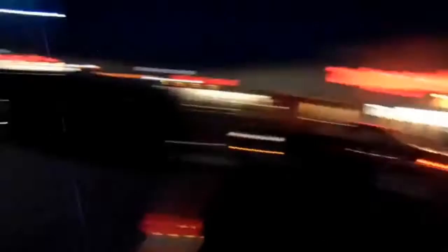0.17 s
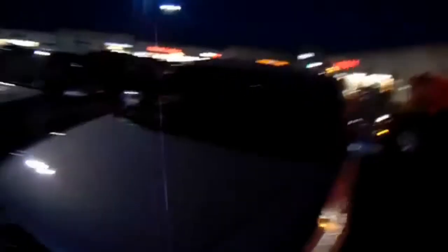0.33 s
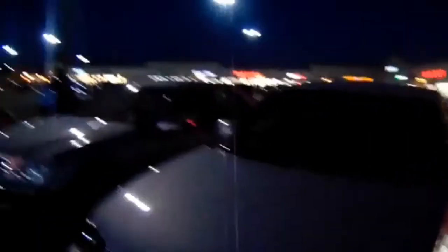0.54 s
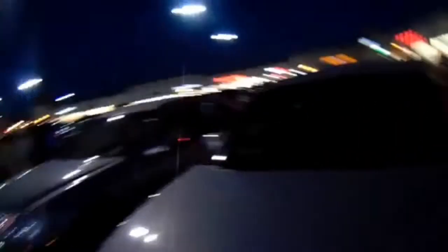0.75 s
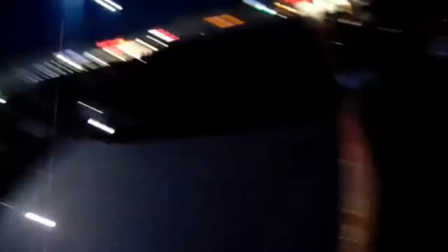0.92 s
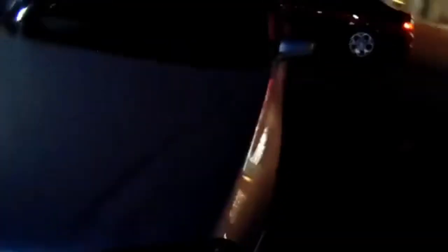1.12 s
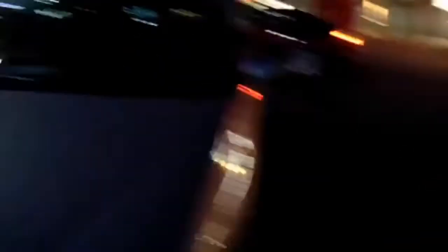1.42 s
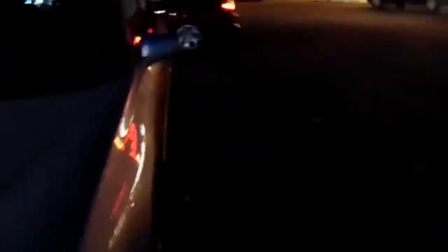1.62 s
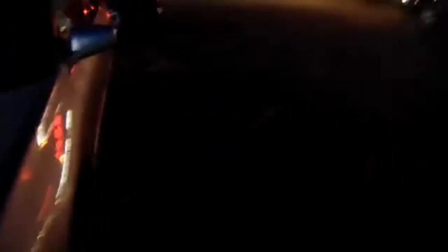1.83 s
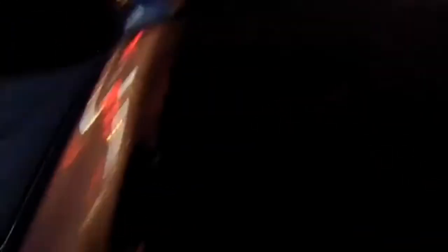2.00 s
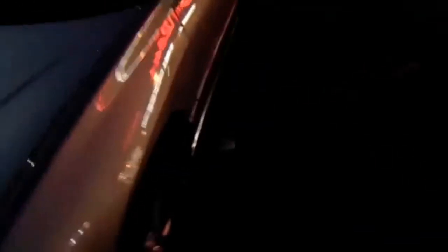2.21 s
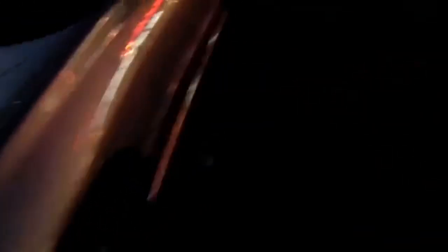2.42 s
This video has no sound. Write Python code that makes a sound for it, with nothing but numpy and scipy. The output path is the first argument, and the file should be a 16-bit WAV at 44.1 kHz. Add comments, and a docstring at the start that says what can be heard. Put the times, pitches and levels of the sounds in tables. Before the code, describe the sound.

One loud, boomy car door slam outdoors, then engine hum and airy rush swelling back

```python
"""A car park at night: a car door is slammed close to the microphone, beside an idling engine.
Contacts crash as decaying noise bands, panel and cabin ring as modes, and the microphone overloads.
Its gain control ducks, then lets hum (summed engine orders) and fan and traffic (noise bands) swell back.
A small tick falls in the slam's tail; later come a dull bump (noise and modes), a hard click (modes)
and a run of small scratchy ticks (noise)."""
import sys
import numpy as np
from scipy import signal
from scipy.io import wavfile
from scipy.ndimage import uniform_filter1d

SR = 44100
rng = np.random.default_rng(int(sys.argv[2]) if len(sys.argv) > 2 else 0)


def unload_audio(sound):
    """Save the sound as a 16-bit wav file, at the path given as the first command line argument."""
    columns = np.transpose(np.atleast_2d(sound))
    # keep every value between -1 and 1, then stretch to whole-number steps
    steps = np.round(np.clip(columns, -1, 1) * 32767)
    wavfile.write(sys.argv[1], SR, steps.astype(np.int16))


N = 112454
TIME = np.arange(N) / SR  # seconds
BAND_EDGES_HZ = 20 * 2 ** np.arange(0, 9.9, 1 / 3)  # third octaves
BAND_CENTRES_HZ = np.sqrt(BAND_EDGES_HZ[1:] * BAND_EDGES_HZ[:-1])

# idle rate of the engine: start_s, rate_hz
IDLE_RATE = [(0, 35.86), (0.7, 36.1), (1.25, 36.25), (1.9, 36.17), (2.55, 36)]
# engine orders: multiple of the idle rate, level_db
LOW_ORDERS = [(4, 1.5), (5, -1.5)]
UPPER_ORDERS = [(6, -1.5), (8, -4.5), (9, -1), (10, 0), (11, -22.5), (12, -3), (13, -15.5), (14, -8.5),
                (15, -16.5), (19, -11), (20, -21), (21, -22), (22, -18), (23, -15), (24, -10.5)]
# engine as heard while the microphone moves round the car:
# start_s, second_order_db, third_order_db, low_orders_db, upper_orders_db
HUM_LEVEL = [(0, -53, -40, -47.5, -49.5), (0.2, -35, -46, -42, -54), (0.5, -32, -22.5, -28.5, -40),
             (0.9, -27, -30, -30, -40.5), (1.25, -31.5, -27.5, -31.5, -38.5), (1.6, -38, -49, -33.5, -40.5),
             (1.9, -37.5, -32.5, -35, -39), (2.1, -36.5, -38.5, -35, -32), (2.27, -41, -28.5, -36, -39),
             (2.42, -32.5, -27, -33.5, -35.5), (2.55, -39, -30, -34, -38)]
FIRING_BLUR_TURNS = 0.17  # random phase spread between orders
WHIRR_BAND_HZ, WHIRR_DB = (1400, 1750), -15  # level relative to the second order

# colour of fan and traffic noise: pitch_hz, density_db (per Hz, relative)
AIR_COLOUR = [(25, 1), (70, 3), (150, -1.5), (240, -7), (350, -4), (600, -12.5), (850, -9), (1330, -15.5),
              (1600, -17), (2600, -23), (3500, -27), (5000, -31.5), (8000, -36), (14000, -39.5)]
# its level: start_s, bass_db, low_middle_db, middle_db, treble_db
AIR_LEVEL = [(0, -33.5, -34.5, -33.5, -30.5), (0.22, -36.5, -32.5, -35.5, -31.5),
             (0.5, -22, -26.5, -28.5, -29), (0.85, -21.5, -28.5, -31, -27), (1.2, -28.5, -29.5, -27, -28),
             (1.7, -31, -30.5, -30, -31), (2.0, -34.5, -31, -29, -29), (2.3, -38, -27.5, -28.5, -28.5),
             (2.55, -40, -30.5, -27.5, -28.5)]
# centres of those four zones: pitch_hz
AIR_ZONES_HZ = (70, 240, 900, 7000)

# door contacts (seal, latch, frame, rattles): start_s, level_db, brightness_db_per_octave
SLAM_CONTACTS = [(0.236, -21.5, -5), (0.2478, -1, 0.36), (0.2535, -13.5, 4), (0.260, 2, -0.66),
                 (0.277, 0, 0), (0.2855, 0, -5), (0.2912, 0, -1), (0.3005, -2, -4.5), (0.311, -12, -8),
                 (0.334, -10, -1)]
# crash of each contact: pitch_hz, density_db (per Hz, relative)
CRASH_COLOUR = [(40, -2.5), (190, 0), (450, -0.5), (950, -7.5), (1700, -16), (3100, -14), (6000, -25.5),
                (8500, -33.5), (14000, -36)]
# its decay: pitch_hz, t60_s
CRASH_DECAY = [(60, 0.41), (300, 0.14), (1000, 0.19), (3000, 0.11), (12000, 0.14)]
# blows that ring the panel: start_s, level_db
PANEL_BLOWS = [(0.2535, 6.5), (0.2855, -5.5)]
# modes of door panel and glass: pitch_hz, level_db, t60_s
PANEL_MODES = [(107.4, -22, .45), (152.6, -31, .18), (191.8, -8, .2), (241.6, -13.5, 0.14),
               (351, -17.5, 0.14), (404, -18, .17), (440, -23.5, .16), (551, -18.5, .16),
               (633.2, -14, 0.13), (728, -16, .14), (798, -16.5, .14), (967, -12, 0.18), (1039, -19, 0.11),
               (1172, -7.5, 0.053), (2740, -22, .1)]
# air trapped in the cabin as the door seats: start_s, level_db
SEATING = [(0.2665, -3)]
# modes of the cabin: pitch_hz, level_db, t60_s
CABIN_MODES = [(61, 10, 0.24), (46.15, -5, 0.85), (29, -7, 0.17)]
# jingles of small metal parts: start_s, level_db
JINGLES = [(0.320, -24), (0.336, -29), (0.353, -30), (1.396, -36), (1.4055, -41)]
# modes of those parts: pitch_hz, level_db, t60_s
JINGLE_MODES = [(7160, -18.5, 0.027), (9520, -1.5, 0.016), (10150, -2, 0.017), (11100, -13, .03)]
CRACKLE_PER_S, CRACKLE_DB = 450, 1.36  # random levels per second, their spread
ECHO_S, ECHO_DB, ECHO_CUT_HZ = 0.11, -13.5, 150

# small scratchy ticks: start_s, level_db, brightness_db_per_octave
TICKS = [(0.495, -29, 3.5), (1.9515, -26, -4.5), (1.9703, -26.5, -2), (1.9835, -23, -3.5),
         (2.075, -36, 3.5), (2.098, -27, -3), (2.12, -34, 1), (2.1293, -27, -1.5), (2.141, -35, 4)]
# their colour: pitch_hz, density_db (per Hz, relative)
TICK_COLOUR = [(60, -20.5), (300, 14), (600, -29), (1700, -1), (2700, -22), (3500, 2.5), (4500, -20),
               (5600, -26), (14000, -28)]
# their decay: pitch_hz, t60_s
TICK_DECAY = [(300, 0.1), (4000, 0.018)]

# contacts of a dull bump near the microphone: start_s, level_db, brightness_db_per_octave
BUMP_CONTACTS = [(1.311, -22, -1), (1.345, -24.5, 4.5), (1.354, -9, -2), (1.361, -22, 2), (1.385, -18, 2),
                 (1.403, -18, 2), (1.453, -24, -4.5)]
# their colour: pitch_hz, density_db (per Hz, relative)
THUD_COLOUR = [(25, 3), (170, 3), (400, -6.5), (800, -16), (2000, -26), (5000, -42), (14000, -58)]
# their decay: pitch_hz, t60_s
THUD_DECAY = [(50, .2), (400, 0.15), (5000, 0.098)]
# weight of the bump: start_s, level_db
BUMP_BLOWS = [(1.3545, -15)]
# modes of that weight: pitch_hz, level_db, t60_s
BUMP_MODES = [(30, -3, 0.13), (70, 3.5, 0.06), (156, -7, .08), (220.3, -1, 0.065), (289, -13, 0.054)]

# a hard click and its rebound: start_s, level_db
CLICKS = [(1.8562, -18), (1.8611, -33)]
# modes of the clicking body: pitch_hz, level_db, t60_s
CLICK_MODES = [(1036.8, 1.5, 0.033), (1170, -2, .028), (1242, 4, 0.025), (1603, 1.5, 0.032),
               (2080, -9.5, 0.0335), (2930, -9, 0.0087), (3360, -3, 0.0092), (4060, -3, .007)]
CLICK_BAND_HZ = (930, 3760)

# microphone: gain control, then overload and the ends of its range
DUCK_ABOVE_DB, DUCK_DB = -9, 19  # threshold, cut aimed for
DUCK_ATTACK_S, DUCK_HOLD_S, DUCK_RELEASE_S = 0.079, 0.23, 0.77
OVERLOAD, OVERLOAD_LEAK = 0.78, 0.017  # clipping ceiling, share of unclipped signal added
LOW_CUT_HZ, HIGH_CUT_HZ = 4, 14250


def from_db(db):
    """Decibels to gain."""
    return 10 ** (np.asarray(db) / 20)


def in_time(rows):
    """Each column of a curve at every sample."""
    start_s, *columns = np.transpose(rows)
    return [np.interp(TIME, start_s, column) for column in columns]


def at_hz(points, hz):
    """Read a table on a log-frequency axis."""
    pitch_hz, value = np.transpose(points)
    return np.interp(np.log(hz), np.log(pitch_hz), value)


def drift(rate):
    """Slow chance with a spread near 1, drawn anew rate times a second and joined by lines."""
    knots = rng.standard_normal(size=4096)
    return np.interp(TIME * rate, np.arange(len(knots)), knots)


def dull(x, hz):
    """Gentle low-pass."""
    cut_hz = min(hz, SR / 2 - 100)
    return signal.sosfilt(signal.butter(2, cut_hz, fs=SR, output="sos"), x)


def band_pass(x, edges_hz, order):
    """Keep what lies between two edges."""
    return signal.sosfilt(signal.butter(order, edges_hz, "band", fs=SR, output="sos"), x)


def noise_band(k):
    """White noise through the k-th third-octave band."""
    return band_pass(rng.standard_normal(N), BAND_EDGES_HZ[k:k + 2], order=2)


def band_gains(colour):
    """Gains that give white noise this colour at rms 1."""
    gains = from_db(at_hz(colour, BAND_CENTRES_HZ))
    power = np.sum(gains ** 2 * np.diff(BAND_EDGES_HZ)) * 2 / SR
    return gains / np.sqrt(power)


def impulses(start_s, sizes):
    """One impulse at each time."""
    out = np.full(N, 1e-18)  # a trace above zero keeps the filters quick
    np.add.at(out, (start_s * SR).astype(int), sizes)
    return out


def ring(hits, modes):
    """Hits set a body's modes ringing, each with a slightly different strength."""
    start_s, hit_db = np.transpose(hits)
    out = 0
    for hz, mode_db, t60_s in modes:
        r = from_db(-60 / (t60_s * SR))  # decay per sample
        w = 2 * np.pi * hz / SR
        sizes = from_db(hit_db + mode_db + rng.standard_normal(len(start_s)))
        resonator = [0, np.sin(w)], [1, -2 * r * np.cos(w), r * r]
        out = out + signal.lfilter(*resonator, impulses(start_s, sizes))
    return out


def crash(hits, colour, decay, pivot_hz):
    """Countless close modes: each hit starts noise that rises and dies at its own pace in each band."""
    start_s, hit_db, tilt = np.transpose(hits)
    out = 0
    for k, (hz, gain) in enumerate(zip(BAND_CENTRES_HZ, band_gains(colour))):
        r = from_db(-120 / (at_hz(decay, hz) * SR))  # decay of power per sample
        octaves = max(np.log2(hz / pivot_hz), -1)  # no further tilt beyond an octave below
        sizes = from_db(hit_db + tilt * octaves)
        power = signal.lfilter([1], [1, -r], impulses(start_s, sizes ** 2))
        envelope = dull(np.sqrt(power), hz)  # softens the onset, most in the bass
        out = out + gain * envelope * noise_band(k)
    return out


def engine(waver_db):
    """Multiples of the idle rate, nearly in step so each firing putters, with a faint whirr."""
    turns = np.cumsum(in_time(IDLE_RATE)[0]) / SR
    groups = ([(2, 0)], [(3, 0)], LOW_ORDERS, UPPER_ORDERS)
    levels = in_time(HUM_LEVEL)
    whirr = band_pass(rng.standard_normal(N), WHIRR_BAND_HZ, order=2)
    # the whirr follows the level of the second order
    out = from_db(levels[0] + WHIRR_DB) * whirr / whirr.std()
    for orders, level_db in zip(groups, levels):
        for multiple, order_db in orders:
            phase_turns = multiple * turns + FIRING_BLUR_TURNS * rng.standard_normal()
            tone = np.sqrt(2) * np.sin(2 * np.pi * phase_turns)  # rms 1
            out = out + from_db(level_db + order_db + waver_db * drift(5.4)) * tone
    return out


def air(flicker_db):
    """Smooth rush of the cooling fan and far traffic: noise bands that flicker slightly in level."""
    levels = in_time(AIR_LEVEL)
    zones = np.eye(len(levels))
    out = 0
    for k, (hz, gain) in enumerate(zip(BAND_CENTRES_HZ, band_gains(AIR_COLOUR))):
        # each band blends the levels of its neighbouring zones
        shares = [np.interp(np.log(hz), np.log(AIR_ZONES_HZ), zone) for zone in zones]
        level_db = sum(share * db for share, db in zip(shares, levels))
        out = out + gain * from_db(level_db + flicker_db * drift(24)) * noise_band(k)
    return out


def door():
    """Crackling crash of contacts, ring of panel, boom of cabin, a dull echo, jingle of metal parts."""
    crackle = from_db(CRACKLE_DB * drift(CRACKLE_PER_S))
    contacts = crackle * crash(SLAM_CONTACTS, CRASH_COLOUR, CRASH_DECAY, pivot_hz=482)
    slam = contacts + ring(PANEL_BLOWS, PANEL_MODES) + ring(SEATING, CABIN_MODES)
    delayed = np.interp(TIME - ECHO_S, TIME, slam)
    echo = from_db(ECHO_DB) * dull(delayed, ECHO_CUT_HZ)
    return slam + echo + ring(JINGLES, JINGLE_MODES)


def ticks():
    """Small scratchy contacts, each a short burst of coloured noise."""
    return crash(TICKS, TICK_COLOUR, TICK_DECAY, pivot_hz=2000)


def bump():
    """Dull bump near the microphone: noisy contacts over the low modes of its weight."""
    contacts = crash(BUMP_CONTACTS, THUD_COLOUR, THUD_DECAY, pivot_hz=247)
    return contacts + ring(BUMP_BLOWS, BUMP_MODES)


def click():
    """Hard click and its rebound: short modes kept within one band."""
    return band_pass(ring(CLICKS, CLICK_MODES), CLICK_BAND_HZ, order=4)


def scene():
    """Everything at one microphone."""
    knocks = door() + bump() + click() + ticks()
    background = engine(waver_db=1.27) + air(flicker_db=0.37)
    return (knocks + background)[None]


def gain_control(x):
    """Loud sound pulls the gain down; it holds, then creeps back."""
    threshold = from_db(DUCK_ABOVE_DB)
    power = uniform_filter1d(x * x, size=2048)  # mean over 46 ms
    loud = (np.abs(x) > threshold) & (power > threshold ** 2)
    since_s = TIME - np.maximum.accumulate(np.where(loud, TIME, -np.inf))
    cut_db = DUCK_DB * np.exp(-np.maximum(since_s - DUCK_HOLD_S, 0) / DUCK_RELEASE_S)
    r = np.exp(-1 / (DUCK_ATTACK_S * SR))
    smooth_cut_db = signal.lfilter([1 - r], [1, -r], cut_db)
    return x * from_db(-smooth_cut_db)


def record(dry):
    """Gain control, overload with nearly flat tops, and cuts at both ends of the range."""
    x = gain_control(dry[0]) / OVERLOAD
    clipped = OVERLOAD * x / (1 + x ** 6) ** (1 / 6)
    low_cut = signal.butter(1, LOW_CUT_HZ, "high", fs=SR, output="sos")
    high_cut = signal.ellip(10, 0.2, 75, HIGH_CUT_HZ, fs=SR, output="sos")
    out = signal.sosfilt(low_cut, clipped + OVERLOAD_LEAK * x)
    return signal.sosfilt(high_cut, out)[None]


dry = scene()
out = record(dry)
unload_audio(out)
```